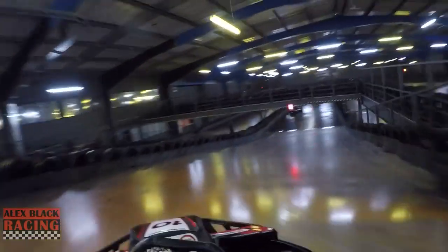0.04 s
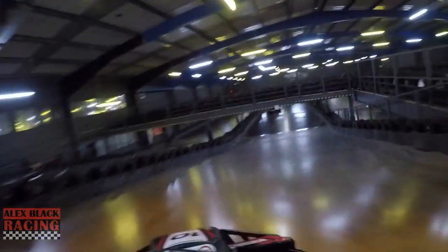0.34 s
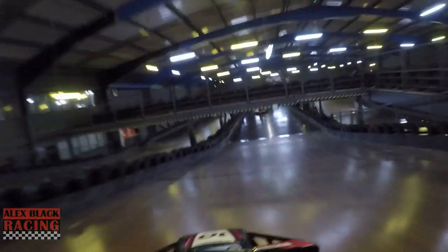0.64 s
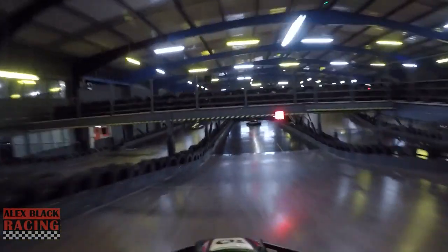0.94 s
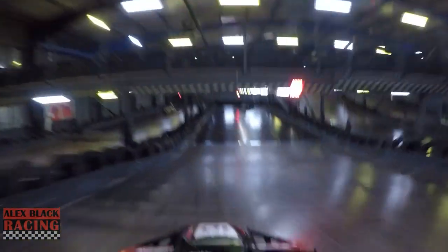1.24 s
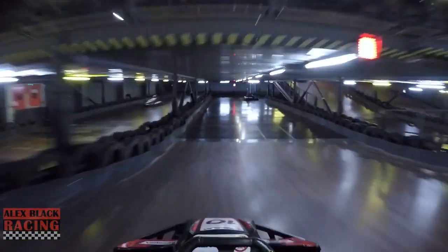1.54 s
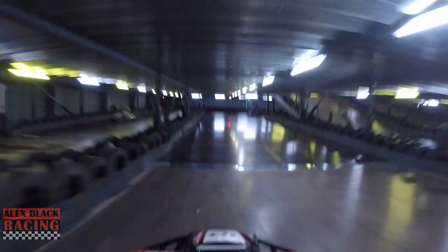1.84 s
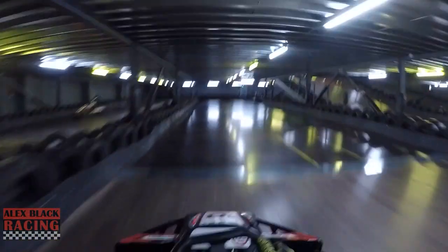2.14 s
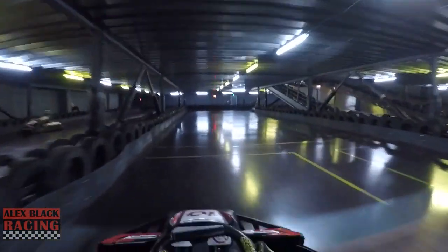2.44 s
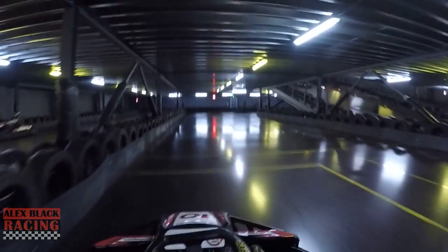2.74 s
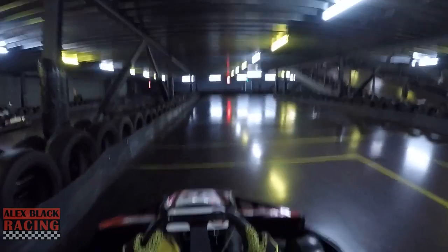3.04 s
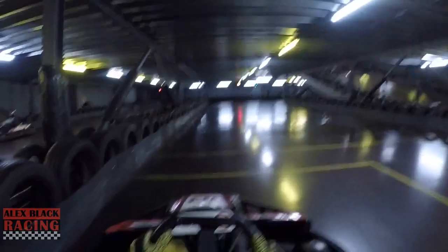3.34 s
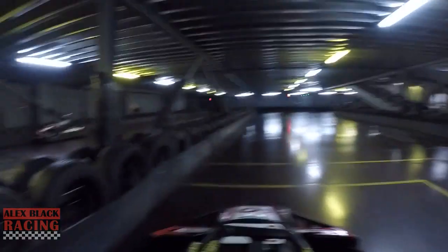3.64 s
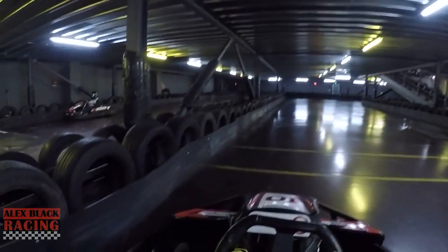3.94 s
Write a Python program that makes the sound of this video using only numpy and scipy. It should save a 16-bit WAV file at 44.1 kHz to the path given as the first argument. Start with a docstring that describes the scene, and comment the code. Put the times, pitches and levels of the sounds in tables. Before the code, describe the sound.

A go-kart drives through a large hall, heard on board. Its motor rumbles, rattles and briefly whines under tyre hiss and a distant, echoing squeal, with dull bumps from about 1.2 seconds. At 1.8 seconds the motor fades and the tyres slide in loud, wavering squeals that drop in pitch and last until 3 seconds. Thin squeaks and short scrapes follow, then returning rumble and a cluster of thumps around 3.5 seconds.

```python
"""In a large hall with a smooth floor, on board a go-kart. Uneven motor firings shake the frame over a
deep rumble, the drive whines and the tyres roar and hiss, while an earlier squeal hangs in the hall,
smeared by reflections. Bumps set the frame ringing in damped thumps. Then the kart slides: rubber sticks
and slips, a self-excited oscillation heard as wavering squeals. Thin squeaks and more bumps follow."""
import sys
import numpy as np
from scipy import signal
from scipy.fft import rfft, irfft
from scipy.io import wavfile
from scipy.ndimage import uniform_filter1d, minimum_filter1d

SR = 44100
rng = np.random.default_rng(int(sys.argv[2]) if len(sys.argv) > 2 else 0)


def dump(signal):
    """Clip the signal to [-1, 1] and save it as 16-bit WAV at the path in sys.argv[1]."""
    limited = np.clip(np.atleast_2d(signal).T, -1, 1)
    pcm = np.round(limited * 32767).astype(np.int16)
    wavfile.write(sys.argv[1], SR, pcm)


N = 176400
T = np.arange(N) / SR

# Squeal heard by way of the hall. Each row: time in seconds, pitch in Hz, level in dB.
FAR_SQUEAL = [(0, 2351, -22.5), (.15, 2483, -22), (.3, 2703, -25.5), (.45, 3010, -23), (.62, 3048, -19),
              (.82, 2944, -16.5), (1.05, 2686, -18), (1.25, 2520, -18.5), (1.45, 2468, -22.5),
              (1.74, 2350, -29.5), (2.4, 2358, -40)]
# Its octave. Each row: time in seconds, level in dB against the squeal.
FAR_OCTAVE = [(0, -32), (.45, -22), (.8, -19), (1.3, -13.5), (1.8, -23.5)]
# Envelopes of motor rattle, rumble, tyre roar and tyre hiss. Each row: time in seconds, level in dB.
MOTOR_LEVEL = [(0, -28), (.6, -22), (.95, -21), (1.2, -27.5), (1.45, -22.5), (1.64, -21.5), (1.8, -30),
               (2.05, -45), (2.45, -41.5), (2.56, -28), (2.7, -43), (2.92, -40), (3.0, -24), (3.18, -37.5),
               (3.3, -46), (3.37, -20), (3.44, -38.5), (3.52, -25.5), (3.66, -43), (4, -37.5)]
RUMBLE_LEVEL = [(0, -28), (.5, -20.5), (.9, -20.5), (1.25, -15.5), (1.38, -21), (1.65, -19), (1.9, -22.5),
                (2.1, -33.5), (2.4, -46.5), (2.55, -51.5), (2.9, -43), (3.05, -28), (3.17, -39), (3.3, -31),
                (3.45, -24), (3.62, -21), (3.78, -29.5), (3.9, -46), (4, -40)]
ROAR_LEVEL = [(0, -32), (.87, -30), (.93, -19), (1.05, -23.5), (1.3, -24.5), (1.5, -29), (1.74, -31.5),
              (1.82, -46), (2.0, -52), (2.15, -34.5), (2.55, -36.5), (2.85, -37), (3.2, -41), (3.5, -39.5),
              (3.7, -43), (3.9, -41.5), (4, -40.5)]
HISS_LEVEL = [(0, -30.5), (.15, -29), (.33, -36.5), (.55, -35.5), (.75, -29), (1.0, -33), (1.3, -45.5),
              (1.76, -48), (1.83, -29.5), (2.3, -28), (2.95, -33.5), (3.1, -39.5), (3.4, -40.5), (3.6, -53),
              (4, -87)]
# Spectra of those four, the hall and the scrapes. Each row: frequency in Hz, relative level in dB.
MOTOR_SPECTRUM = [(50, -35), (110, -11), (190, 1), (280, -5.5), (420, -11), (700, -19), (1500, -57.5),
                  (9000, -88.5)]
RUMBLE_SPECTRUM = [(15, -22), (30, -1), (55, 1.5), (95, 2), (140, -1), (220, -11), (500, -62.5),
                   (4000, -100)]
ROAR_SPECTRUM = [(200, 7), (450, -3), (900, 0), (1400, -1), (2200, -3.5), (4500, -19.5), (7000, -38.5),
                 (13000, -65)]
HISS_SPECTRUM = [(2000, -7.5), (4000, 2.5), (6000, -10), (7500, -19), (9500, -25), (11000, -42),
                 (15000, -51)]
HALL_SPECTRUM = [(100, -0.5), (500, -11.5), (1400, -9.5), (2050, 13), (3000, -23), (5600, -24.5),
                 (7000, -34), (10000, -36.5), (15000, -48)]
SCRAPE_SPECTRUM = [(150, 1), (350, -1), (900, 9.5), (1600, 4.5), (3000, -2), (5500, 0), (7000, -27),
                   (11000, -34), (15000, -27.5)]
# Partials of the drive's whine. Each row: frequency in Hz, level in dB before the swell.
WHINE_PARTIALS = [(732, -37.5), (812, -33), (1007, -31)]
# Swell of the whine. Each row: time in seconds, gain in dB.
WHINE_SWELL = [(0, -3), (.25, 0.5), (.5, -1), (.75, -6.5), (1.1, -23), (1.8, -41)]
# Bumps through the frame. Each row: start in seconds, level in dB, ring frequency in Hz,
# decay time in seconds, knock in dB against the ring.
BUMPS = [(1.186, -11.5, 88.85, .025, -20), (1.313, -3.5, 185, 0.0095, -8), (1.585, -12, 109.5, 0.031, -7),
         (1.729, -11.5, 88, 0.027, -9), (2.556, -23.5, 170, .03, -14), (2.97, -17.5, 221, .03, -13),
         (3.247, -18.5, 110, .018, -14), (3.398, -15, 130, .008, -6), (3.48, -13.5, 172, 0.011, -6.5),
         (3.501, -7.5, 188.5, .01, -7), (3.553, -16.5, 201.7, 0.0075, -6), (3.583, -8, 121.7, 0.019, -14),
         (3.633, -11.5, 89.3, 0.033, -40), (3.716, -8, 127, 0.011, -14), (3.743, -8.5, 164.4, 0.0084, -37),
         (3.814, -22.5, 170, 0.011, -5), (3.905, -27, 260, 0.018, -1.5)]
# Two sliding tyres and the remaining tread. Each row: time in seconds, pitch in Hz, level in dB.
LOW_TYRE = [(1.757, 2600, -20), (1.762, 2698, -12), (1.785, 2880, -13.5), (1.81, 2625, -6.5),
            (1.86, 2472, -21), (1.93, 2200, -15), (2.03, 2034, -18), (2.15, 1923, -17), (2.32, 1850, -17.5),
            (2.5, 1918, -24.5), (2.6, 2145, -24), (2.73, 2163, -20), (2.8, 2015, -19), (2.86, 2180, -19.5),
            (2.98, 2190, -23), (3.03, 2200, -50)]
HIGH_TYRE = [(1.795, 3570, -34.5), (1.803, 3500, -7), (1.835, 3124, -15.5), (1.87, 2836, -17),
             (1.902, 2800, -13), (1.951, 2366, -20), (1.99, 2548, -7), (2.02, 2880, -17.5),
             (2.08, 2420, -25), (2.16, 2480, -21), (2.21, 2180, -24.5), (2.429, 2258, -20.5),
             (2.476, 2618, -18.5), (2.54, 2150, -20.5), (2.641, 2450, -19), (2.76, 2185, -39),
             (2.941, 2474, -19), (3.01, 2300, -47)]
TREAD = [(1.79, 3000, -51), (1.82, 2900, -20), (1.93, 2557, -27), (2.15, 2187, -17.5), (2.4, 2091, -20),
         (2.58, 2062, -16.5), (2.67, 1972, -17.5), (2.8, 2105, -18), (2.96, 2192, -19), (3.04, 2183, -27)]
# Brief squeaks. Each row: start and length in seconds, first and last pitch in Hz, level in dB,
# roughness as a share of the pitch.
SQUEAKS = [(1.759, .032, 2620, 2736, -16.5, .06), (1.796, .055, 3440, 3040, -22.5, .07),
           (1.902, .045, 2434, 2040, -16, 0.12), (1.856, 0.13, 3326, 2944, -21, 0.023),
           (2.264, 0.047, 3280, 3035, -23, .015), (2.366, 0.14, 2975, 3426, -25.5, 0.016),
           (2.021, 0.028, 2895, 2774, -20.5, 0.028), (2.526, 0.042, 1600, 1708, -22.5, 0.084),
           (2.639, 0.073, 1663, 1616, -27, 0.069), (3.034, .035, 3400, 3476, -28.5, 0.0079),
           (3.075, 0.07, 3650, 3560, -29, 0.0037), (3.134, 0.038, 3430, 3440, -27.5, 0.02),
           (3.165, 0.067, 3845, 3930, -34, 0.0032), (3.073, 0.098, 5110, 5425, -33, 0.0088),
           (3.156, 0.056, 5300, 5400, -33, 0.036), (3.221, 0.086, 5620, 5740, -29, 0.0049),
           (3.292, .045, 5840, 5950, -29.5, 0.019), (3.335, 0.0556, 5400, 5010, -37, 0.064)]
# Tyre scrapes. Each row: start in seconds, length in seconds, level in dB.
SCRAPES = [(2.42, 0.06, -32.5), (2.63, .06, -36), (2.946, .12, -33), (3.305, 0.11, -28)]

FIRING_HZ, FIRING_DECAY_CYCLES = 37.86, 0.99
HALL_T60_S, TREBLE_T60_S, CROSSOVER_HZ, AIR_HZ = 2.1, 0.97, 3000, 5860
HALL_DB, TYRE_WET_DB, SQUEAK_WET_DB = -43, -12, -8.5
LIMIT_DB, LIMIT_S, TOP_HZ = -2, .004, 15100


def amp(db):
    """Decibels to amplitude ratio."""
    return 10 ** (np.asarray(db) / 20)


def unit(x):
    """Normalise to rms 1."""
    return x / np.sqrt(np.mean(x ** 2) + 1e-20)


def curve(rows, axis=1):
    """Linear interpolation of one table column in time."""
    rows = np.array(rows, float)
    return np.interp(T, rows[:, 0], rows[:, axis])


def walk(rate):
    """Smooth random modulation of rms 1, changing about rate times a second."""
    f = np.arange(N // 2 + 1) * SR / N
    return unit(irfft(rfft(rng.standard_normal(N)) / (1 + (2 * f / rate) ** 4), N))


def colour(x, points):
    """Spectral shaping by (Hz, dB) points, to rms 1."""
    hz, db = np.array(points, float).T
    f = np.maximum(np.arange(N // 2 + 1) * SR / N, 1)
    return unit(irfft(rfft(x) * amp(np.interp(np.log(f), np.log(hz), db)), N))


def noise(points):
    """Coloured noise of rms 1."""
    return colour(rng.standard_normal(N), points)


def lowpass(x, hz, order=4):
    """Attenuate the treble above hz."""
    return signal.sosfilt(signal.butter(order, hz, fs=SR, output="sos"), x)


def stick_slip(hz, wander, wander_rate, rough, flutter_db, overtone_db=-21, harmonics=4):
    """Friction oscillation: rubber grips and lets go, giving a tone that wanders and flutters."""
    pitch = hz * (1 + wander * walk(wander_rate) + rough * walk(699.5))
    phase = 2 * np.pi * np.cumsum(pitch) / SR
    overtones = sum(amp(overtone_db - 10 * (k - 1.5)) * np.sin(k * phase)
                    for k in range(2, harmonics + 1))
    return unit((np.sin(phase) + overtones) * amp(flutter_db * walk(130)))


def patches(hz, spread, rough, count, harmonics=4):
    """Incoherent addition: tread patches squeal around one pitch, the outer ones more weakly."""
    offsets = np.linspace(-1, 1, count) * np.sqrt(2)
    return unit(sum(stick_slip(hz * np.exp(spread * k), .045, 22, rough, 2.58, harmonics=harmonics)
                    * amp(-4 * k * k) for k in offsets))


def contact(rows):
    """Amplitude envelope of a slide, zero before and after it."""
    return amp(curve(rows, axis=2)) * (T > rows[0][0]) * (T < rows[-1][0])


def far_squeal():
    """Multiple reflection smears a squeal into a wash that rises, then sinks in pitch."""
    hz = curve(FAR_SQUEAL)
    wash = patches(hz, spread=.18, rough=.05, count=16, harmonics=1)
    upper = amp(-8) * patches(hz * 1.42, spread=.14, rough=.05, count=8, harmonics=1)
    octave = amp(curve(FAR_OCTAVE)) * patches(2 * hz, spread=.15, rough=.029, count=6, harmonics=1)
    return lowpass(wash + upper + octave, AIR_HZ, order=6) * contact(FAR_SQUEAL)


def motor():
    """Forced vibration: each uneven firing shakes the frame with a decaying burst of noise."""
    cycle = np.cumsum(FIRING_HZ * (1 + .072 * walk(25))) / SR % 1
    bursts = rng.standard_normal(N) * np.exp(-cycle / FIRING_DECAY_CYCLES) * amp(3 * walk(27))
    return colour(bursts, MOTOR_SPECTRUM) * amp(curve(MOTOR_LEVEL))


def drive_whine():
    """Frequency modulation: the partials of the loaded drive waver together with its speed."""
    speed = 1 + .006 * walk(5)
    whine = sum(amp(db) * stick_slip(hz * speed, .0088, 50, rough=.012, flutter_db=5, harmonics=1)
                for hz, db in WHINE_PARTIALS)
    return whine * amp(curve(WHINE_SWELL))


def rumble():
    """Low-frequency random vibration of motor and chassis."""
    return noise(RUMBLE_SPECTRUM) * amp(curve(RUMBLE_LEVEL))


def rolling():
    """Rolling contact radiates broadband noise: a roar and a hiss, both in small surges."""
    roar = noise(ROAR_SPECTRUM) * amp(curve(ROAR_LEVEL) + 1.84 * walk(50))
    hiss = noise(HISS_SPECTRUM) * amp(curve(HISS_LEVEL) + .91 * walk(25) + 1.1 * walk(300))
    return roar + hiss


def hall_background():
    """The diffuse field lingering in the hall, as faint steady noise."""
    return amp(HALL_DB) * noise(HALL_SPECTRUM)


def bumps():
    """Impact excitation: each bump gives a dull knock and a damped oscillation of the frame."""
    out = np.zeros(N)
    thud = noise([(80, 6), (300, -2.5), (750, -4.5), (1300, -39.5), (4000, -48), (12000, -91.5)])
    for start, db, hz, decay, knock_db in BUMPS:
        age = np.maximum(T - start, 0)
        attack = 1 - np.exp(-age / .002)
        ring = np.sin(2 * np.pi * hz * age) * np.exp(-age / decay)
        knock = amp(knock_db) * thud * np.exp(-age / .008)
        out += amp(db) * attack * (ring + knock)
    return out


def slide():
    """Stick-slip oscillation: two tyres sing over the chatter of the tread, and all of it judders."""
    tyres = sum(stick_slip(curve(rows), wander=.02, wander_rate=70, rough=.025, flutter_db=3.5)
                * contact(rows) for rows in (LOW_TYRE, HIGH_TYRE))
    hz = curve(TREAD)
    tread = patches(hz, spread=.11, rough=.06, count=4)
    tread += amp(-8.5) * patches(hz * 1.45, spread=.11, rough=.03, count=3)
    judder = amp(1.4 * walk(270))
    direct = lowpass(tyres + tread * contact(TREAD), hz=6660, order=3) * judder
    return direct + amp(TYRE_WET_DB) * reverberation(direct)


def reverberation(x):
    """Diffuse reflections decay exponentially, the treble sooner; air absorption takes the top."""
    onset = rng.standard_normal(N) * (1 - np.exp(-T / .012))
    tail = lowpass(onset, CROSSOVER_HZ) * amp(-60 * T / HALL_T60_S)
    tail += rng.standard_normal(N) * amp(-60 * T / TREBLE_T60_S)
    response = lowpass(tail / np.sqrt(np.sum(tail ** 2)), AIR_HZ, order=6)
    return signal.fftconvolve(x, response)[:N]


def squeaks():
    """Short spells of stick-slip: gliding chirps within the slide, thin squeaks as it ends."""
    direct = np.zeros(N)
    for start, length, first_hz, last_hz, db, rough in SQUEAKS:
        progress = np.clip((T - start) / length, 0, 1)
        hz = first_hz + (last_hz - first_hz) * progress
        tone = stick_slip(hz, .00312, 74.7, rough, flutter_db=2.4, overtone_db=-15.5, harmonics=2)
        direct += amp(db) * np.sqrt(4 * progress * (1 - progress)) * tone
    direct = lowpass(direct, hz=7700)
    return direct + amp(SQUEAK_WET_DB) * reverberation(direct)


def scrapes():
    """Sliding friction of the tyres gives short arches of gritty noise."""
    arches = sum(amp(db) * np.sqrt(1 - np.clip(2 * (T - start) / length - 1, -1, 1) ** 2)
                 for start, length, db in SCRAPES)
    return arches * noise(SCRAPE_SPECTRUM) * amp(2.7 * walk(100))


def scene():
    """Superposition of all sources at the driver's seat."""
    squeals = slide() + far_squeal() + squeaks()
    machine = motor() + drive_whine() + rumble()
    return (squeals + machine + rolling() + scrapes() + bumps() + hall_background())[None]


def record(dry):
    """Peak limiting ducks the loudest moments; a steep low-pass cuts the top."""
    size = int(LIMIT_S * SR)
    gain = np.minimum(1, amp(LIMIT_DB) / (np.abs(dry) + 1e-9))
    held = minimum_filter1d(gain, 2 * size)
    smooth = uniform_filter1d(uniform_filter1d(held, size), size)
    return signal.sosfilt(signal.ellip(8, .2, 70, TOP_HZ, fs=SR, output="sos"), dry * smooth)


dry = scene()
out = record(dry)
dump(out)
```